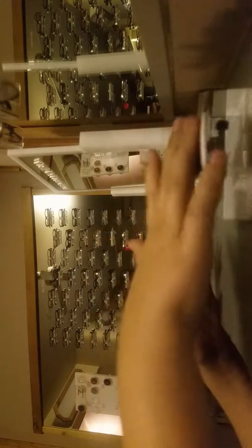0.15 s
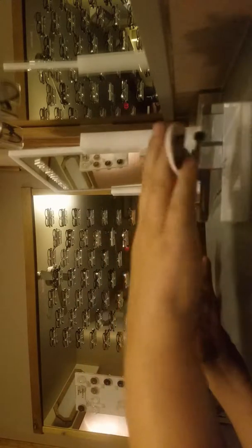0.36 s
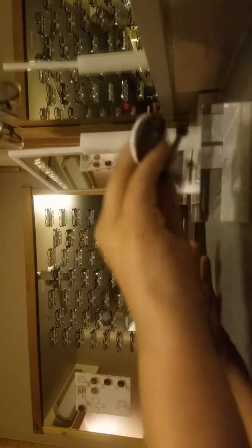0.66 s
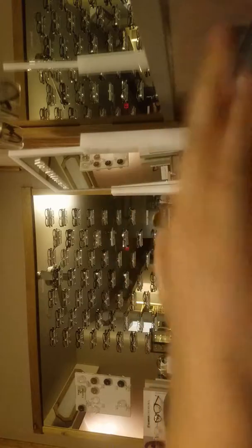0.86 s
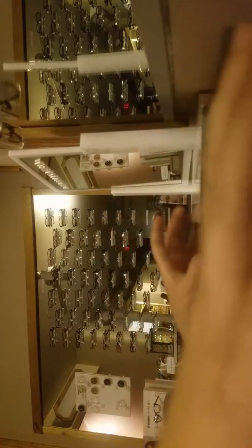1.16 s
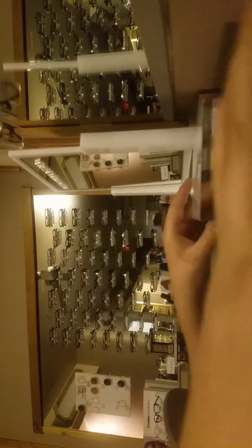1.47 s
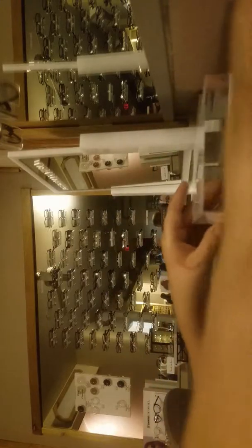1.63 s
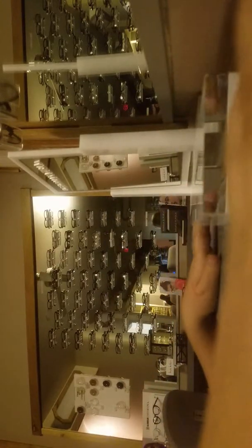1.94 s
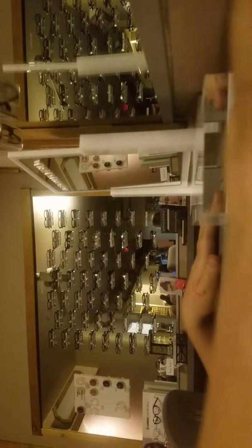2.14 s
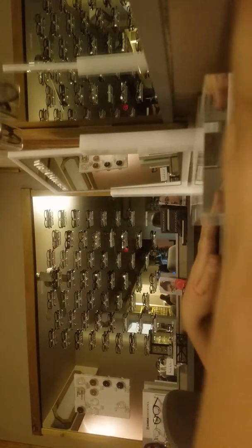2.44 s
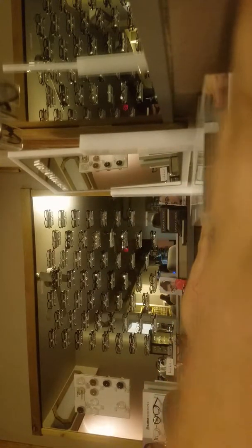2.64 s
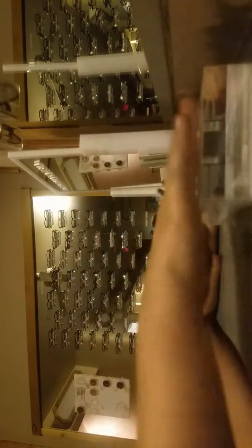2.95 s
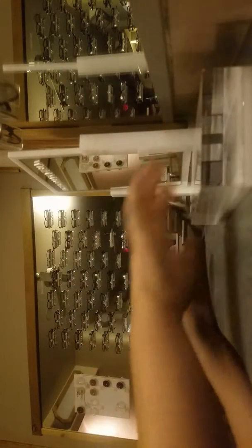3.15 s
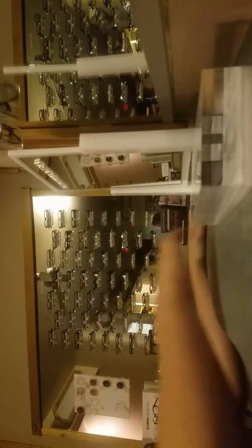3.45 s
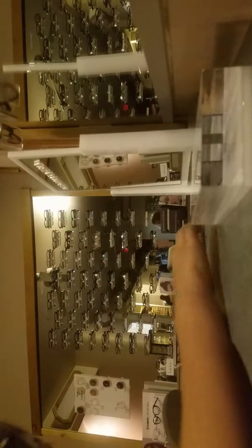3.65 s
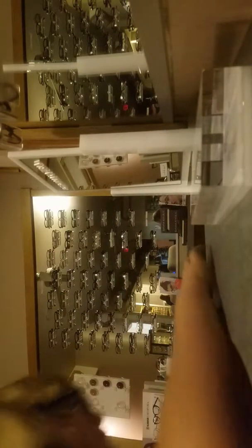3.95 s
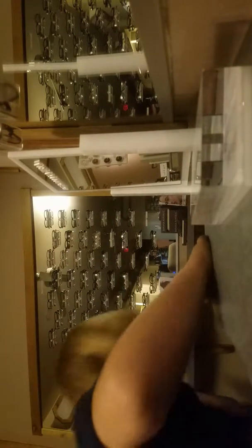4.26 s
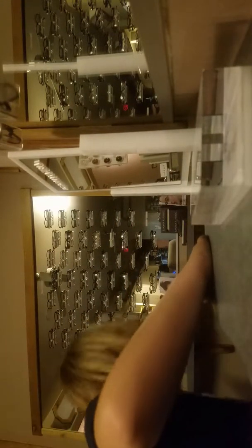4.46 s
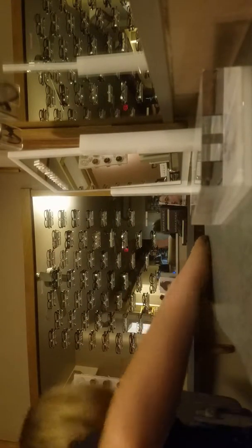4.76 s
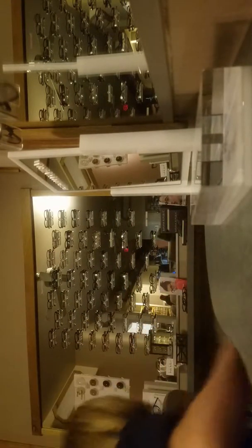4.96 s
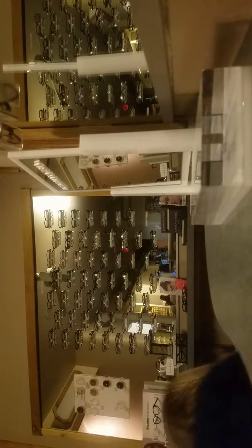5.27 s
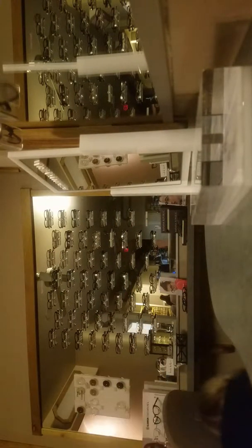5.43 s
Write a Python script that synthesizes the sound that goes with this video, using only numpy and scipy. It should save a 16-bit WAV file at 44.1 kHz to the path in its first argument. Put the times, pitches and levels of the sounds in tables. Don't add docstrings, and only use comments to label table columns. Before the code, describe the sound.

Very close to the microphone, a tiny skateboard snaps and lands on a hard counter beside a hollow plastic box, its wheels briefly scraping and whistling. After a sparse, ticking lull come more clacks and box knocks, then a clattering crash off the edge. An arm then pushes and rubs softly before one heavy low thump with a skin squeak. A small room hums and echoes lightly.

```python
import sys
import numpy as np
from scipy import signal
from scipy.fft import rfft, irfft, next_fast_len
from scipy.io import wavfile
from scipy.ndimage import uniform_filter1d

SR = 44100
rng = np.random.default_rng(int(sys.argv[2]) if len(sys.argv) > 2 else 0)


def magnitude_from_level(level_db):
    exponent = np.asarray(level_db, float) / 20
    return 10 ** exponent


def master_out(mix):
    frames = np.transpose(np.atleast_2d(mix))
    ceiling = np.clip(frames, -1, 1)
    pcm = np.round(ceiling * 32767).astype(np.int16)
    wavfile.write(sys.argv[1], SR, pcm)


N = 246959

# [t/s, peak/dB, deck re axle/dB, sizzle re axle/dB, length/ms]
CLACKS = [(0.0098, -11.5, -6.5, 3.5, 6.3), (0.0181, -21.5, 0, -0.5, 6), (0.02, -18, -0.5, 4.5, 7),
          (0.1577, -15, 3.5, -12, 2.5), (0.7734, -22, 4, 12, 3.5), (0.7763, -18, -13, 9.5, 2.5),
          (0.8043, -12.5, -9, 11, 2.3), (0.8071, -15, 0, 8, 3.2), (0.809, -29.5, 12, -33, 12.6),
          (0.993, -38, 6, 9.5, 7.9), (1.1062, -8.5, -1, 7, 0.39), (1.458, -38.5, 10, 17.5, 9.9),
          (1.5994, -28.5, 1, -6, 2.9), (2.2765, -34, 6.5, -42, 4.1), (2.6063, -9, -3, 5.5, 3.2),
          (2.808, -10.5, -2.5, 3, 5), (2.924, -25.5, 0, 4, 8), (2.9317, -15.5, 9.5, -5, 4.2),
          (2.994, -27.5, 14.5, 4, 7.2), (3.1232, -29.5, 7, 11, 3), (3.1448, -24, -4.5, 1, 8.6),
          (3.4966, -18.5, 3.5, 4, 2), (3.497, -15, -1, -8, 4), (3.5026, -20.5, 8.5, 1, 6),
          (3.6245, -25, -2, 2.5, 18), (4.0453, -39, -5, 7, 13.6)]
# [t/s, peak/dB, side/dB: plus = wooden deck, minus = metal axle]
TAPS = [(0.124, -32.5, 4), (0.79, -29, 5.5), (0.8205, -30, -2), (0.8467, -34, -1), (0.864, -28.5, -8),
        (0.882, -30, -5), (0.8922, -29, -6), (0.944, -38, -16.5), (1.001, -38.5, -6), (1.102, -36, 0),
        (1.1207, -19, 2), (1.6956, -51, 10.5), (2.3, -49.5, 12), (2.552, -45.5, 1), (2.566, -43.5, -16),
        (2.619, -25, 4.5), (2.561, -51, -15), (2.582, -40, -14), (2.571, -50, 7), (2.944, -30.5, 5),
        (3.176, -49, 21.5), (3.248, -40, -4), (4.513, -39.5, -7), (2.247, -44.5, 1), (0.128, -36, -4.5)]
TAP_MS, TAP_SIZZLE_DB_PER_DECK_DB = 3.5, -1.07
LEAD, LEAD_S = 0.15, 0.00057
CHATTER, CHATTER_S = 0.72, 0.0044
SIZZLE_PAN_DB = 4


def clacks():
    a, b, c = rng.standard_normal((3, 2, N))
    a[1] = 0.5 * np.roll(a[0], 4) + 0.85 * a[1]
    deck = body(a, [(1910, 970, 2), (2464, 205, 8.5), (2860, 440, -3.5)])
    axle = body(b, [(4460, 1670, -2.0), (5430, 970, 0.0), (7470, 1400, -4.0)])
    sizzle = body(c, [(12000, 2960, -3.0), (11940, 1650, 1.5), (16500, 2030, -3.5)])
    pan_db = SIZZLE_PAN_DB * np.array([[0.5], [-0.5]])
    taps = [(s, db, side, TAP_SIZZLE_DB_PER_DECK_DB * side, TAP_MS) for s, db, side in TAPS]
    out = np.zeros((2, N))
    t = np.arange(-250, 1200) / SR
    for s, db, deck_db, sizzle_db, ms in CLACKS + taps:
        u = np.maximum(t, 0) / (max(ms, 0.3) * 0.0004)
        strike = u ** 2 * np.exp(2 - 2 * u)
        chatter = CHATTER * np.minimum(u, 1) * np.exp(-abs(t) / CHATTER_S)
        lead = LEAD * np.exp(-abs(t) / LEAD_S)
        first = round((s + t[0]) * SR)
        at = slice(first, first + len(t))
        for part, part_db in (deck, deck_db), (axle, 0), (sizzle, sizzle_db + pan_db):
            burst = part[:, at] * (strike + chatter + lead)
            peak = abs(burst).max(axis=1, keepdims=True)
            add(out, s + t[0], magnitude_from_level(db + part_db) * burst / peak)
    return out


# [t/s, peak/dB, f/Hz, t60/s, L-R/dB]
DECK = [(0.019, -28, 2500, 0.023, 6), (0.385, -54, 2500, 0.046, 1), (0.517, -52, 2600, 0.032, -4),
        (0.7758, -25, 1800, 0.034, -0.5), (0.807, -24.5, 2270, 0.041, 3), (0.9046, -32, 2210, 0.014, -6),
        (0.9125, -26, 2450, 0.023, -2.5), (1.1062, -30, 2098, 0.063, 9), (2.6066, -15.5, 2184, 0.0048, 5.5),
        (2.6066, -20, 4960, 0.013, 2), (2.6185, -36, 5100, 0.023, -6), (.776, -27, 5050, 0.011, -7),
        (.776, -20.5, 7000, 0.019, 7), (.808, -29, 5080, 0.016, 0), (2.81, -31, 3620, 0.029, 0),
        (2.933, -29, 3600, .012, 3), (2.933, -21, 2100, .015, -2), (1.601, -31, 2210, .012, 3),
        (2.809, -35.5, 2470, 0.018, 7.5), (2.932, -22, 2500, .015, 5), (2.995, -15.5, 1970, 0.0084, 4),
        (3.123, -25, 2500, 0.035, 3)]


def deck_rings():
    return rings(DECK, partial=1.09, partial_db=1, rise_ms=0.28)


# [t/s, peak/dB, f/Hz, t60/s, L-R/dB]
KNOCKS = [(0.159, -2, 940, 0.018, 5), (0.161, -20.5, 1247, 0.052, 17.5), (0.991, -35.5, 860, 0.032, -3),
          (1.994, -42.5, 843, 0.042, 2), (2.298, -37.5, 1000, 0.043, 6), (2.5925, -27, 1160, 0.048, -1),
          (2.604, -31, 951, 0.092, 2), (2.811, -8.5, 851, 0.038, -1.5), (2.932, -9, 985, 0.021, 5),
          (2.944, -18.5, 1160, 0.05, 5), (2.945, -24, 1550, 0.061, -7), (3.534, -21, 975, 0.035, 1.5),
          (3.595, -21, 1170, .03, -8), (3.123, -13.5, 933, 0.011, 5.5), (3.141, -26.5, 1050, 0.028, 6),
          (3.497, -25.5, 900, 0.049, -19.5)]


def box_knocks():
    return rings(KNOCKS, partial=1.11, partial_db=-23.5, rise_ms=0.79)


def box_knocks_far():
    return rings(KNOCKS, partial=0.73, partial_db=-25.0, rise_ms=0.35, damp=3.6)


# [t/s, peak/dB, f/Hz, t60/s, L-R/dB]
BLOWS = [(0.01, -21.5, 413, 0.088, 2), (0.157, -11, 608, 0.038, 3.5), (0.805, -37.5, 558, 0.29, 2.5),
         (1.103, -28, 391, 0.051, 0), (1.6, -27.5, 321, 0.035, -9), (2.607, -34, 242, 0.081, 14),
         (2.807, -19, 416, 0.089, 4), (2.932, -30, 522, 0.059, 7), (2.974, -28, 546, 0.095, 9.5),
         (2.994, -25.5, 521, 0.079, 4), (3.123, -26, 618, 0.039, 0), (3.143, -22, 474, 0.011, 6),
         (3.301, -28, 379, 0.01, 3), (1.595, -41.5, 92.3, 0.22, -6.5), (5.012, -28.5, 117.6, 1, -2),
         (5.158, -23.5, 90, 0.42, -1), (5.222, -26, 550, 0.18, 6), (5.23, -43, 748, 0.069, -2),
         (5.246, -17.5, 417, 0.081, -1)]


def counter_blows():
    return rings(BLOWS, partial=1.2, partial_db=-8.0, rise_ms=1.4)


# [crest t/s, peak/dB, f/Hz, L-R/dB]
PUSHES = [(0.1739, -12.5, 323, 3), (0.2133, -16.5, 397, 4), (0.2308, -12, 346, 4.5),
          (1.6021, -15, 1150, -5.5), (3.281, -20, 357, 4.5), (3.5058, -31, 800, 0), (3.522, -15, 550, 0),
          (3.5305, -15, 696, -3), (3.536, -13, 700, 0), (3.545, -18, 600, -10), (3.5486, -23, 600, 0),
          (3.629, -8.5, 302, 1.5), (3.663, -23, 300, -7), (3.677, -22, 280, -3), (3.7, -33, 200, 6),
          (3.729, -17, 221, -2), (3.932, -21, 198, 2), (5.2141, -3.5, 203, 5.5), (5.2259, -8, 273, -0.5),
          (5.244, -15, 200, -9), (5.258, -19, 263, 5), (5.272, -18, 200, 5), (5.2806, -8.5, 137, 0),
          (5.287, -11, 162, 4.5)]


def pushes():
    out = np.zeros((2, N))
    t = np.arange(-400, 400) / SR
    for s, db, hz, pan_db in PUSHES:
        swell = np.exp(-(2.05 * hz * t) ** 2)
        wave = np.cos(2 * np.pi * hz * t)
        wave -= (wave * swell).sum() / swell.sum()
        add(out, s + t[0], magnitude_from_level(db) * sides(pan_db) * wave * swell)
    return out


# [t/s, level/dB]
THUMPS = [
    (0.161, -24),
    (5.213, -4.5),
    (5.25, -14),
]
# [f/Hz, level/dB, t60/s]
COUNTER = [(73.8, -22, 1), (90.8, -16, 0.62), (162, -11.5, 0.46), (188.9, -7, 0.33), (250, -29, 0.376),
           (346, -21, 0.23), (515, -20.5, 0.053)]


def thumps():
    out = np.zeros((2, N))
    t = np.arange(SR // 2) / SR
    ring = sum(magnitude_from_level(db - 60 * t / t60) * np.sin(2 * np.pi * hz * t) for hz, db, t60 in COUNTER)
    rise = 1 - np.exp(-t / 0.00248)
    for s, db in THUMPS:
        add(out, s, magnitude_from_level(db) * ring * rise * sides(-1.4))
    return out


# [start t/s, contact/s, deck/dB, wheels re deck/dB, grit re deck/dB]
SLIDES = [(-.05, 0.19, -35, -9.5, -11), (0.496, 0.12, -57.5, -2.5, -6), (.81, 0.053, -40.5, 0, -8),
          (0.87, 0.06, -58.5, 21.5, 13.5), (1.01, 0.068, -49.5, -1.5, -11),
          (1.321, 0.14, -47.5, -9.5, -21.5), (1.45, 0.085, -42, -12, -21), (1.53, 0.11, -52, -9, -10.5),
          (2.16, 0.14, -57, -6, -12), (2.27, 0.011, -45.5, -4, -10), (2.809, 0.073, -37, -2.5, -1.5),
          (2.938, 0.06, -39.5, 2.5, -2), (3.0, 0.11, -57.5, 3.5, 3.5), (3.119, 0.026, -41, -1, 3.5),
          (3.265, 0.033, -50, -8, -14), (3.41, 0.07, -49.5, -16, -31)]
# [end t/s, deck/dB, wheels re deck/dB, grit re deck/dB]
RUN_UPS = [
    (2.604, -33, 3, -2),
]
# [f/Hz, width/Hz, level/dB]
SLIDE_BODY = [(410, 184, 4), (829, 130, 5.5), (953, 170, 0), (1238, 71, 2.5)]
# [f/Hz, width/Hz, level/dB]
WHEELS = [(1550, 330, 1), (2370, 270, 1.5), (3145, 440, -5)]
# [f/Hz, density/dB per Hz]
GRIT = [(2060, -14), (3500, -3), (5130, 1.5), (6440, -1.5), (9320, -5.5), (12600, -1.5), (15500, -8),
        (16500, -29)]
SLIDE_RISE = 0.31
SLIDE_LIFT_DB_PER_S, RUN_UP_DB_PER_S = 341.5, 654


def slides():
    drive = slips(500, 2.5, 1.3)
    deck, wheels = body(drive, SLIDE_BODY), body(drive, WHEELS)
    grit = shaped(slips(250, 2.5, 2.2), GRIT)
    out = np.zeros((2, N))
    t = np.arange(N) / SR
    for s, contact, db, wheel_db, grit_db in SLIDES:
        level = press(s, contact, db, SLIDE_RISE, SLIDE_LIFT_DB_PER_S)
        out += level * (deck + magnitude_from_level(wheel_db) * wheels + magnitude_from_level(grit_db) * grit)
    for end, db, wheel_db, grit_db in RUN_UPS:
        level = (t < end) * magnitude_from_level(db - RUN_UP_DB_PER_S * np.clip(end - t, 0, 1))
        out += level * (deck + magnitude_from_level(wheel_db) * wheels + magnitude_from_level(grit_db) * grit)
    return out


# [t/s, f/Hz, level/dB]
ROLL = [
    (.82, 1150, -66),
    (.85, 1210, -57),
    (.88, 1270, -35),
    (.895, 1430, -57),
    (.915, 1484, -35),
    (.94, 1550, -46),
    (.97, 1500, -72),
]
ROLL_WIDTH_HZ, OVERTONE_DB = 160, -1


def roll():
    s, hz, db = np.transpose(ROLL)
    drive = slips(400, 3.07, 0.74)
    tone = np.zeros((2, N))
    for k, gain in (1, 0.84), (2, magnitude_from_level(OVERTONE_DB)):
        once = resonate(drive, (s, k * hz), ROLL_WIDTH_HZ)
        tone += gain * resonate(once, (s, k * hz), ROLL_WIDTH_HZ)
    return evened(tone) * magnitude_from_level(np.interp(np.arange(N) / SR, s, db, -120, -120))


# [t/s, clatter/dB, boom/dB, rattle/dB]
CRASH = [
    (3.494, -16, -17, -22.5),
    (3.615, -59, -29, -57),
]
# [f/Hz, width/Hz, level/dB]
CRASH_BODY = [(712, 95, -1), (985, 140, 1), (1290, 260, -5), (1644, 125, -4), (2080, 230, -3.5),
              (2600, 460, -9.5), (3300, 140, -9.5)]
# [f/Hz, width/Hz, level/dB]
BOOM_BODY = [(163, 14, 1), (286, 67, -10.5), (417, 56, -14.5), (443, 11.7, 9.5), (551, 78, 0)]
CRASH_RISE_S, CRASH_HOLD_S = 0.013, 0.029
CLATTER_DB_PER_S, BOOM_DB_PER_S, RATTLE_DB_PER_S = 116, 131, 170


def crash():
    drive = slips(1200, 2, 2.2)
    clatter, boom = body(drive, CRASH_BODY), body(drive, BOOM_BODY)
    rattle = shaped(drive, [(3500, 3.5), (6000, 1.5), (9000, -6.0), (13000, -5), (16500, -22)])
    layers = (clatter, CLATTER_DB_PER_S), (boom, BOOM_DB_PER_S), (rattle, RATTLE_DB_PER_S)
    contact = CRASH_RISE_S + CRASH_HOLD_S
    out = np.zeros((2, N))
    for s, *levels_db in CRASH:
        for db, (layer, fall) in zip(levels_db, layers):
            out += layer * press(s, contact, db, CRASH_RISE_S / contact, fall)
    return out


# [start t/s, contact/s, weight/dB, skin rub/dB, cloth/dB]
ARM = [(3.625, 0.052, -21, -29, -61), (3.799, 0.044, -32.5, -42.5, -49), (3.916, 0.074, -30, -48.5, -52),
       (4.0, 0.08, -33.5, -54, -53.5), (4.129, 0.035, -33, -58.5, -51.5), (4.215, 0.082, -45, -68, -49.5),
       (4.397, 0.014, -36.5, -57.5, -50), (4.499, 0.022, -45, -55, -49), (4.66, 0.045, -58, -53, -53),
       (4.779, 0.015, -44, -50, -85), (5.002, 0.043, -38, -48.5, -67), (5.06, 0.15, -38.5, -51.5, -57.5),
       (5.208, 0.036, -17, -32, -62), (5.26, 0.019, -32, -34, -50), (5.318, 0.056, -32, -35.5, -50),
       (5.401, 0.014, -35, -59, -63), (5.56, 0.085, -44.5, -68, -80)]
# [f/Hz, width/Hz, level/dB]
ARM_BODY = [(90, 9.4, -44), (118.7, 7.53, 4.5), (171.2, 15.8, -0.5), (236.6, 28, -1), (342.5, 49, -13.5)]
# [f/Hz, width/Hz, level/dB]
RUB = [(456, 163, 6.5), (720, 265, 0.5), (1250, 270, -6), (1540, 39, -2.5), (1630, 480, -9),
       (2500, 420, -7), (2810, 3560, -17)]
# [f/Hz, density/dB per Hz]
CLOTH = [(2700, -6.5), (6000, 0), (9500, -2), (12300, 1), (16000, -6)]
# [t/s, f/Hz]
NOTCH = [(3.8, 4800), (3.9, 5200), (4.05, 4100), (4.14, 4700), (4.17, 6100), (4.4, 6100), (4.48, 7000),
         (4.51, 5800), (4.6, 6000), (5.6, 5500)]
NOTCH_WIDTH_HZ = 700
ARM_RISE, SQUEAK_DB = 0.22, -7.5
WEIGHT_DB_PER_S, RUB_DB_PER_S, CLOTH_DB_PER_S, SQUEAK_DB_PER_S = 171.5, 125, 189, 107


def arm():
    rumble = body(slips(120, 2.0, 2.5), ARM_BODY)
    rub = body(slips(220, 2.0, 5.4), RUB)
    squeak = body(slips(160, 0.9, 7.3), [(2470, 230, 0)])
    cloth = shaped(slips(250, 3.5, 1.6), CLOTH)
    rustle = cloth - resonate(cloth, np.transpose(NOTCH), NOTCH_WIDTH_HZ)

    def follow(column, db_per_s):
        return np.max([press(*row[:2], row[column], ARM_RISE, db_per_s) for row in ARM], axis=0)

    out = follow(2, WEIGHT_DB_PER_S) * rumble
    out += follow(3, RUB_DB_PER_S) * rub
    out += follow(4, CLOTH_DB_PER_S) * rustle
    out += magnitude_from_level(SQUEAK_DB) * follow(4, SQUEAK_DB_PER_S) * squeak
    return out


# [start t/s, contact/s, level/dB, f/Hz]
CREAKS = [
    (1.345, 0.17, -60, 2260),
    (4.77, 0.082, -58, 1760),
    (5.225, 0.023, -38.5, 1260),
    (5.44, 0.093, -65, 1585),
    (5.225, 0.018, -49, 2600),
    (5.32, 0.11, -49.5, 1550),
]
CREAK_WIDTH_HZ = 130


def creaks():
    drive = slips(200, 2.5, 1.5)
    out = np.zeros((2, N))
    for s, contact, db, hz in CREAKS:
        whistle = body(drive, [(hz, CREAK_WIDTH_HZ, 0)])
        out += press(s, contact, db, ARM_RISE, CLOTH_DB_PER_S) * whistle
    return out


# [t/s, peak/dB]
TICKS = [(4.6609, -38), (4.76, -42.5), (4.8019, -39), (4.8289, -40), (4.888, -43), (4.927, -42.5),
         (4.966, -45), (4.987, -43), (5.0055, -43), (5.0198, -41), (5.0887, -40), (5.203, -41),
         (5.3636, -48), (5.4447, -41), (5.4729, -39), (5.4992, -40), (5.5378, -39.5), (5.5776, -45.5)]
# [t/s, peak/dB]
TICKS_FAINT = [(0.2486, -41), (0.279, -46), (0.3136, -43), (0.332, -48), (0.379, -36), (0.4118, -43.5),
               (0.449, -48), (0.477, -47.5), (0.5124, -43), (0.519, -39), (0.5481, -54), (0.5766, -57),
               (0.588, -43), (0.601, -41), (0.621, -38), (0.682, -41), (0.6998, -40), (0.732, -38.5),
               (1.0323, -33), (1.0454, -35), (1.2632, -45), (1.2804, -46), (1.3484, -55), (1.57, -42),
              (1.6277, -58), (1.656, -41), (1.6806, -52), (1.718, -46), (1.7725, -43.5), (1.783, -49),
              (1.814, -44), (1.8486, -43), (1.8802, -47), (1.941, -47), (1.9758, -45), (2.0142, -40.5),
              (2.0423, -51), (2.0916, -47), (2.115, -45), (2.148, -44), (2.1963, -51), (2.243, -47),
              (2.3321, -47), (2.4088, -46), (2.428, -46), (2.4486, -42), (2.4932, -50.5), (2.5099, -41),
              (2.5278, -45),
               (3.482, -44), (3.738, -38), (3.7592, -38), (3.786, -47), (3.799, -33), (3.8406, -41),
             (3.8797, -34), (3.923, -42), (4.0461, -40), (4.053, -38), (4.098, -37), (4.13, -43),
             (4.1653, -48), (4.1957, -43), (4.2092, -36), (4.2506, -51), (4.2762, -34), (4.324, -33.5),
             (4.356, -36), (4.3655, -36), (4.4018, -47), (4.458, -42), (4.4655, -39), (4.4856, -42),
             (4.4996, -37), (4.509, -34), (4.5675, -40), (4.5827, -37), (4.5988, -42), (4.6343, -48)]
# [start t/s, end t/s, peak/dB]
TICK_RUNS = [
    (3.38, 3.47, -46),
]
FAINTER_DB, TICK_GAP_S, TICK_SPREAD_DB = -5, 0.034, 3


def ticks():
    puff = np.sin(np.pi * np.arange(70) / 70) ** 2 * np.ones((2, 1))
    puffs = np.zeros((2, N))
    rows = TICKS + [(s, db + FAINTER_DB) for s, db in TICKS_FAINT]
    for start, end, db in TICK_RUNS:
        gap, size = rng.random((40, 2)).T
        times = start + TICK_GAP_S * np.cumsum(0.4 + 1.2 * gap)
        rows += [(s, db + TICK_SPREAD_DB * (2 * v - 1)) for s, v in zip(times, size) if s < end]
    for (s, db), (wait, weaker) in zip(rows, rng.random((200, 2))):
        add(puffs, s, magnitude_from_level(db) * puff)
        add(puffs, s + 0.005 + 0.007 * wait, magnitude_from_level(db - 8 - 16 * weaker) * puff)
    colour = [(4000, -2.5), (6000, -9.5), (8500, 0.0), (12000, -8.5), (15000, 1.0), (16500, 3.5)]
    return magnitude_from_level(1.7) * puffs * shaped(rng.standard_normal((2, N)), colour)


# [f/Hz, t60/s]
ROOM = [(100, 0.16), (500, 0.5), (1500, 0.37), (4000, 0.35), (8000, 0.28), (16000, 0.16)]


def room(x):
    taps = np.zeros((2, SR // 2))
    grid = np.arange(120, SR // 2 - 22, 22)
    at = grid + rng.integers(0, 22, (2, len(grid)))
    np.put_along_axis(taps, at, rng.choice([-1., 1.], at.shape), 1)
    hz, t, z = signal.stft(taps, SR, nperseg=256)
    decay = magnitude_from_level(-60 * t / read(ROOM, hz)[:, None])
    tail = ports(signal.istft(z * decay, SR, nperseg=256)[1])
    return signal.fftconvolve(x, tail / np.linalg.norm(tail[0]), axes=1)[:, :N]


# [f/Hz, density/dB per Hz]
HUM = [(25, -9), (135, -3.5), (220, -8), (330, -18.5), (510, -17.5), (700, -28), (8000, -45.5),
       (16500, -47)]
# [t/s, level/dB]
HUM_SWELL = [(0, -51), (1.05, -43.5), (1.2, -49.5), (1.27, -56.5), (1.361, -54.5), (2.101, -46),
             (3.35, -50), (3.701, -42.5), (5.6, -45.5)]
# [f/Hz, level/dB]
FAN = [(145, -62.5), (339, -68.5), (517, -65.5), (720, -75.5)]
# [f/Hz, density/dB per Hz]
HISS = [(2500, 1.5), (5000, -7.5), (9000, -11), (12500, 6.5), (16500, 1)]
HUM_DB, HISS_DB, FLUTTER_DB = -47, -77.5, 7.5
FAN_DB, FAN_WOBBLE_HZ = 5.0, 1.86


def hum():
    swell_db = np.interp(np.arange(N) / SR, *np.transpose(HUM_SWELL))
    air = shaped(ports(rng.standard_normal((2, N))), HUM)
    air = air * magnitude_from_level(HUM_DB + swell_db - np.median(swell_db))
    wobble = evened(uniform_filter1d(rng.standard_normal((len(FAN), N)), size=6000))
    fan = np.zeros(N)
    for (hz, db), w in zip(FAN, wobble):
        phase = 2 * np.pi * np.cumsum(hz + FAN_WOBBLE_HZ * w) / SR
        fan += magnitude_from_level(db + FAN_DB) * np.sin(phase)
    slow = uniform_filter1d(rng.standard_normal(N), size=500)
    flutter = evened(uniform_filter1d(slow, size=500))
    hiss = magnitude_from_level(HISS_DB + FLUTTER_DB * flutter) * shaped(rng.standard_normal((2, N)), HISS)
    return air + fan + hiss


def rings(rows, partial, partial_db, rise_ms, damp=1):
    out = np.zeros((2, N))
    t = np.arange(SR // 4) / SR - np.array([[0], [0.0001]])
    for s, db, hz, t60, pan_db in rows:
        wave = np.sin(2 * np.pi * hz * t) + magnitude_from_level(partial_db) * np.sin(2 * np.pi * hz * partial * t)
        rise = np.clip(t / (rise_ms * 0.00095), 0, 1)
        decay = magnitude_from_level(db - 60 * damp * t / max(t60, 0.005))
        add(out, s, wave * rise * decay * sides(pan_db))
    return out


def slips(per_s, spread_db, smooth):
    size = magnitude_from_level(spread_db * np.minimum(rng.exponential(1, N), 4))
    hits = size * (rng.random(N) < per_s / SR)
    puffs = signal.lfilter([1], [1, -np.exp(-1 / (0.00084 * SR))], hits)
    return ports((smooth + evened(puffs)) * rng.standard_normal((2, N)))


def press(start, contact, db, rise, db_per_s):
    t = np.arange(0, N + 32, 32) / SR - start
    level = np.clip(t / (rise * contact), 0, 1) ** 2 * magnitude_from_level(db - db_per_s * np.clip(t - contact, 0, 1))
    return np.interp(np.arange(N) / SR - start, t, level)


def body(x, modes):
    def gain(hz):
        return sum((-1) ** k * magnitude_from_level(db) / (1 + 1j * (hz - f) / width) ** 2
                   for k, (f, width, db) in enumerate(modes))
    return evened(filtered(x, lambda hz, z: z * gain(hz)))


def resonate(x, curve, width):
    hz = np.interp(np.arange(N) / SR, *curve)
    turn = np.exp(2j * np.pi * np.cumsum(hz) / SR)
    r = np.exp(-np.pi * width / SR)
    return 2 * (turn * signal.lfilter([1 - r], [1, -r], x / turn)).real


def shaped(x, spectrum):
    low, high = spectrum[0][0], spectrum[-1][0]
    return evened(filtered(x, lambda hz, z: z * magnitude_from_level(read(spectrum, hz)) * (hz > low) * (hz < high)))


# [f/Hz, correlation]
SAME = [(60, 0.88), (130, 0.99), (290, 0.93), (640, 0.33), (1410, -0.15), (3100, 0.16), (6820, -0.24),
        (15000, -0.05)]


def ports(x):
    def blend(hz, z):
        same = np.clip(read(SAME, hz), -1, 1)
        return np.array([z[0], same * z[0] + np.sqrt(1 - same ** 2) * z[1]])
    return filtered(x, blend)


def filtered(x, gain_at):
    size = next_fast_len(x.shape[1])
    return irfft(gain_at(np.fft.rfftfreq(size, 1 / SR), rfft(x, size)), size)[:, :x.shape[1]]


def read(points, hz):
    f, value = np.transpose(points)
    return np.interp(np.log(hz + 1), np.log(f + 1), value)


def evened(x):
    return x / np.sqrt(np.mean(x ** 2) + 1e-20)


def sides(pan_db):
    return magnitude_from_level(np.array([[0.5], [-0.5]]) * pan_db)


def add(mix, s, sound):
    part = mix[:, max(round(s * SR), 0):][:, :sound.shape[1]]
    part += sound[:, :part.shape[1]]


def scene():
    bright = clacks() + deck_rings()
    blows = counter_blows() + pushes() + thumps()
    wet = room(magnitude_from_level(-15.0) * bright + magnitude_from_level(-3.5) * box_knocks_far() + magnitude_from_level(-15.0) * blows)
    hits = bright + box_knocks() + blows + wet
    friction = slides() + roll() + crash() + arm() + creaks()
    return hits + friction + ticks() + hum()


def roll_off(x):
    return signal.sosfilt(signal.butter(12, 16820, fs=SR, output="sos"), x)


# [f/Hz, L-R/dB]
PORTS = [(60, -2), (130, -1.3), (400, 1.5), (2000, -0.5), (5000, -2.5), (9000, -3), (12500, -2.5)]


def record(dry):
    thin = signal.sosfilt(signal.butter(3, 60, "high", fs=SR, output="sos"), dry)
    dull = signal.oaconvolve(thin, signal.firwin(255, 15750, fs=SR)[None], "same")
    uneven = filtered(dull, lambda hz, z: z * sides(read(PORTS, hz)))
    mix = np.clip(uneven, -1, 1)
    return roll_off(mix)


dry = scene()
out = record(dry)
master_out(out)
```